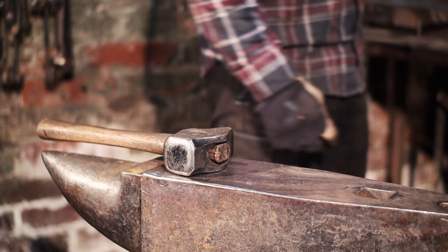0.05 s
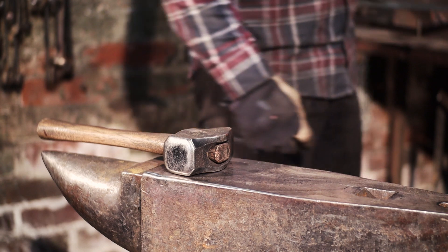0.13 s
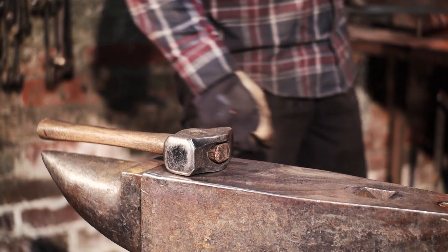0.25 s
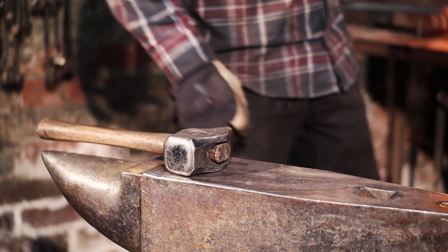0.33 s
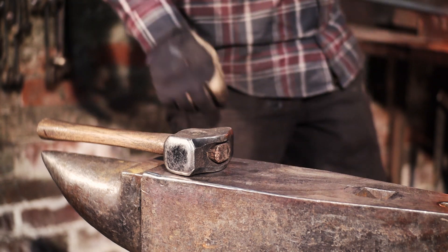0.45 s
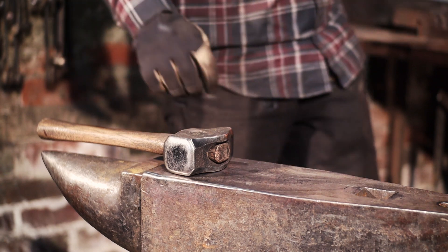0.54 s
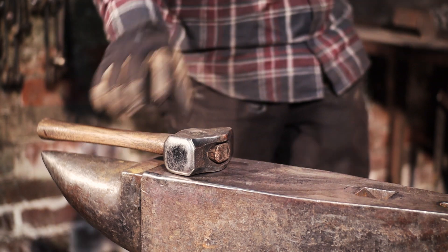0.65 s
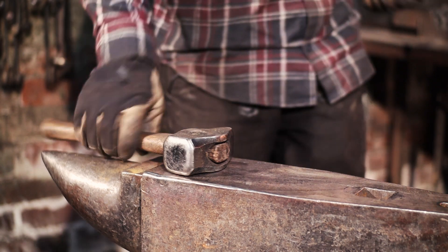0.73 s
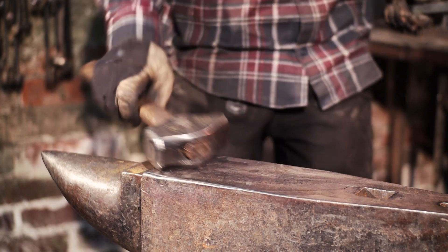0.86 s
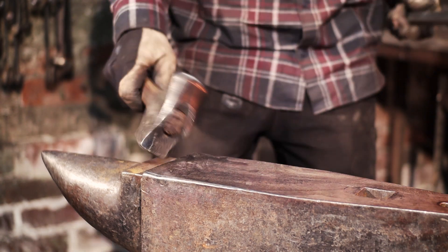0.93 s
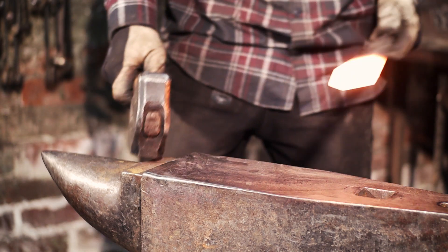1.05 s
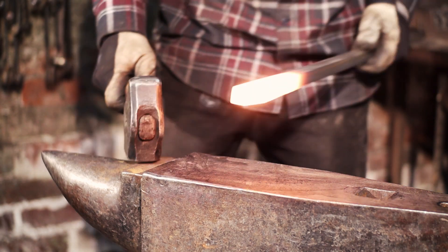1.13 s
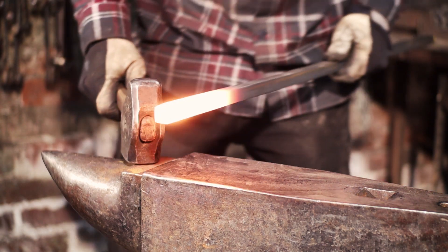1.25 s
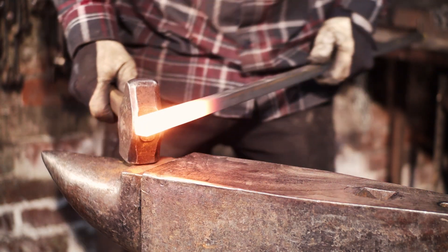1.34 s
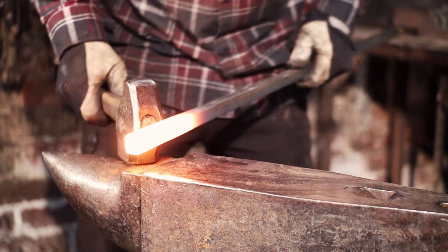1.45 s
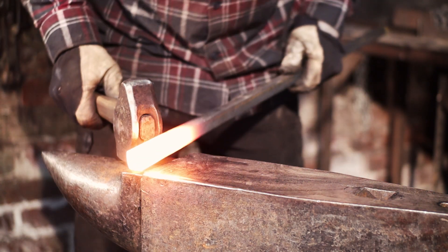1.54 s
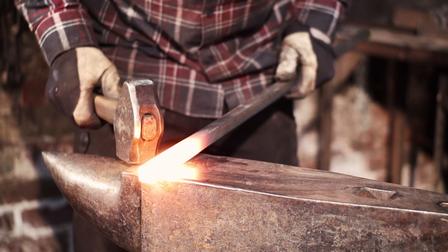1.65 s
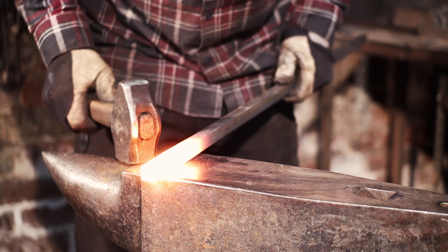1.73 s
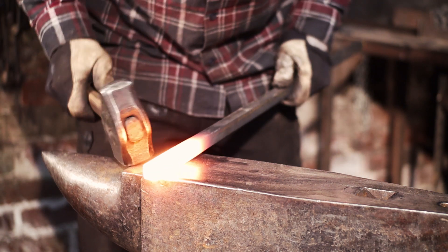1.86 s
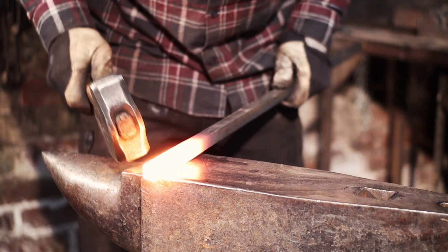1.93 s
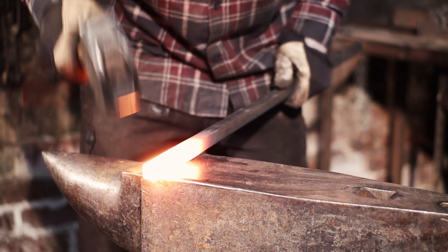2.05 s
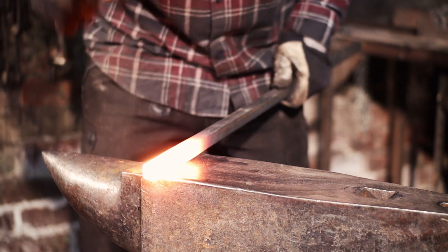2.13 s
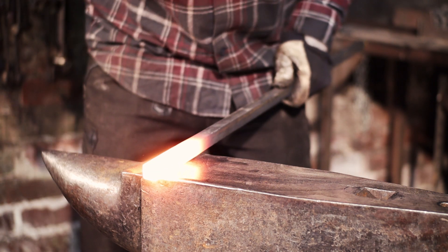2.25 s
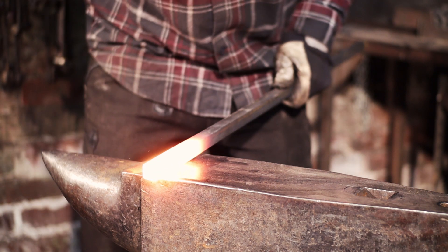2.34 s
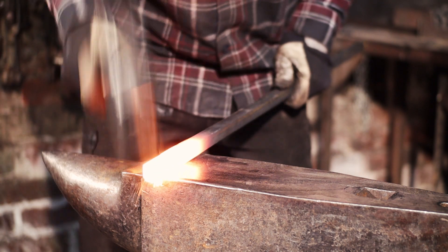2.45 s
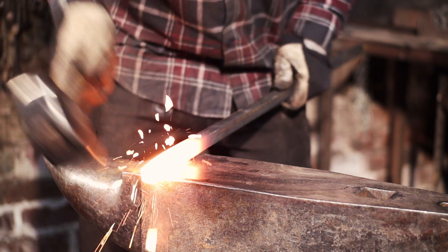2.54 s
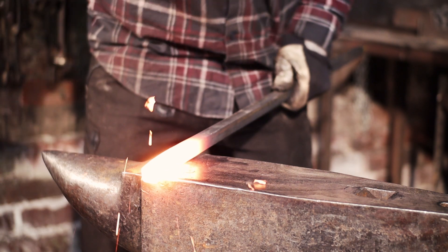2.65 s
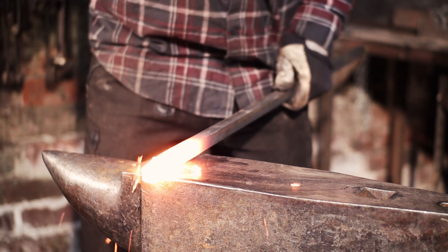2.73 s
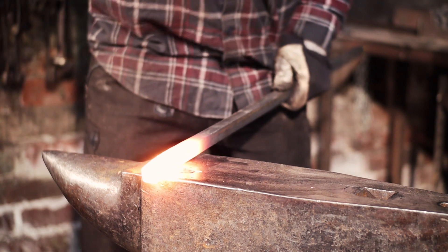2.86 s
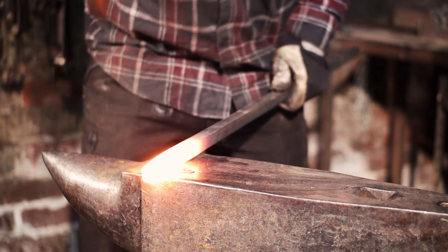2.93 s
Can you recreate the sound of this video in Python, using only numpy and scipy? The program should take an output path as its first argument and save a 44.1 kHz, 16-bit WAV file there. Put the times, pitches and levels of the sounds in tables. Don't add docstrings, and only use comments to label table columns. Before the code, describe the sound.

In a brick forge with a low blower roar, a steel tool clanks, a hammer is lifted and set down, a bar scrapes, then one hard anvil blow thumps and rings; miked near the anvil.

```python
import sys
import numpy as np
from scipy import signal
from scipy.fft import rfft, irfft
from scipy.io import wavfile
from scipy.ndimage import uniform_filter1d

SR = 44100
rng = np.random.default_rng(int(sys.argv[2]) if len(sys.argv) > 2 else 0)


def makeup_ratio(level_db):
    decades = np.asarray(level_db, float) / 20
    return 10 ** decades


def digitize_waveform(pressure):
    field = np.atleast_2d(pressure).T
    bounded = np.clip(field, -1, 1)
    quanta = np.round(bounded * 32767).astype(np.int16)
    wavfile.write(sys.argv[1], SR, quanta)


N = 134505


def rms_one(x):
    return x / np.sqrt(np.mean(x ** 2) + 1e-20)


def at_hz(points, hz):
    table_hz, values = np.transpose(points)
    return np.interp(np.log(hz), np.log(table_hz), values)


def filtered(x, order, hz, kind):
    return signal.sosfilt(signal.butter(order, hz, kind, fs=SR, output="sos"), x)


def colour(x, spectrum):
    hz = np.maximum(np.arange(len(x) // 2 + 1) * SR / len(x), 1)
    octaves_below = np.maximum(np.log2(spectrum[0][0] / hz), 0)
    octaves_above = np.maximum(np.log2(hz / spectrum[-1][0]), 0)
    gain_db = at_hz(spectrum, hz) - 24 * (octaves_below + octaves_above)
    return rms_one(irfft(rfft(x) * makeup_ratio(gain_db), len(x)))


def drift(rate_hz):
    r = np.exp(-2 * np.pi * rate_hz / SR)
    wander = signal.lfilter([1], [1, -2 * r, r * r], rng.standard_normal(N + SR))
    return rms_one(wander[SR:])


def ring(push, hz, t60):
    r, w = makeup_ratio(-60 / (t60 * SR)), 2 * np.pi * hz / SR
    return signal.lfilter([0, np.sin(w)], [1, -2 * r * np.cos(w), r * r], push + 1e-18)


def clicks(s, db):
    out = np.zeros(N)
    index = np.minimum((np.asarray(s) * SR).astype(int), N - 1)
    np.add.at(out, index, makeup_ratio(np.asarray(db)))
    return out


def dying(s, db, t60):
    rise_s = 0.00049
    r = np.exp(-1 / (rise_s * SR))
    jump = signal.lfilter([1], [1, -makeup_ratio(-60 / (t60 * SR))], clicks(s, db) + 1e-18)
    return signal.lfilter([(1 - r) ** 2], [1, -2 * r, r * r], jump)


def contact_push(push, hz, contact_s):
    return ring(push, hz, contact_s) * 2 * np.log(1000) / (contact_s * SR)


def struck(hits, pitches, modes, crack, crack_db, crack_s):
    contact_cycles, longest_contact_s, strength_spread_db = 12, 0.004, 1.5
    ring_wet_db, crack_wet_db = -5.5, 4
    s, db, hardness = np.transpose(hits)
    chance = rng.standard_normal((len(s), len(modes)))
    noise = colour(rng.standard_normal(N), crack)
    cracks = rings = sent = 0
    for at, level, hz in hits:
        soft_hz = min(hz, 0.45 * SR)
        snap = dying([at], [level + crack_db], crack_s) * filtered(noise, 2, soft_hz, "low")
        even = rms_one(filtered(colour(clicks([at], [0]), crack), 2, soft_hz, "low"))
        cracks = cracks + snap
        sent = sent + even * np.sqrt(np.mean(snap ** 2))
    for k, (hz, (mode_db, t60)) in enumerate(zip(pitches, modes)):
        softness_db = 10 * np.log10(1 + (hz / hardness) ** 4)
        push = clicks(s, db + mode_db + strength_spread_db * chance[:, k] - softness_db)
        contact_s = min(contact_cycles / hz, longest_contact_s)
        rings = rings + ring(contact_push(push, hz, contact_s), hz, t60)
    direct = rings + cracks
    to_room = makeup_ratio(ring_wet_db) * rings + makeup_ratio(crack_wet_db) * sent
    return filtered([direct, to_room], 3, crack[0][0], "high")


def thump(s, pitches, modes):
    push_s, wet_db = 0.007, -5
    push, low = clicks([s], [0]), 0
    for hz, (db, t60) in zip(pitches, modes):
        low = low + makeup_ratio(db) * ring(contact_push(push, hz, push_s), hz, t60)
    return np.array([low, makeup_ratio(wet_db) * low])


def blower():
    # (frequency [Hz], level [dB])
    roar = [(26, -36), (45, -8), (107, -22.5), (128, -18), (154, -4), (301, -5.5), (378, -12.5),
            (482, -8.5), (1700, -16.5), (2210, -72), (3740, -120)]
    # (frequency [Hz], level [dB])
    hiss = [(1120, -20), (1900, -1), (2230, -7), (2940, -1), (3770, -7), (5770, -7.5), (6250, -16),
            (14900, -33.5), (15900, -28.5)]
    # (frequency [Hz], rms level [dB])
    hum = [(100, -59.5), (226, -59.5), (302, -63), (800, -71), (12050, -99)]
    roar_db, hiss_db = -52, -64
    out = makeup_ratio(roar_db + 0.262 * drift(12)) * colour(rng.standard_normal(N), roar)
    out += makeup_ratio(hiss_db + 0.5 * drift(1.2)) * colour(rng.standard_normal(N), hiss)
    white = rng.standard_normal(N + SR)
    for hz, db in hum:
        out += makeup_ratio(db) * rms_one(ring(white, hz, 0.36)[SR:])
    return out


def forge(x):
    # (frequency [Hz], t60 [s])
    room_decay = [(60, 1.0), (250, 1.0), (700, 1), (2000, 0.76), (5000, 0.47), (9000, 0.29), (15000, 0.045)]
    first_wall_s, fill_s, even_hz = 0.0015, 0.0044, 120
    band_edges = 22 * 2 ** np.arange(0, 9.6, 1 / 3)
    t, white, tail = np.arange(SR) / SR, rng.standard_normal((2, SR)), 0
    for k, (low, high) in enumerate(zip(band_edges, band_edges[1:])):
        band = filtered(white[k % 2], 2, [low, high], "band")
        tail = tail + band * makeup_ratio(-60 * t / at_hz(room_decay, np.sqrt(low * high)))
    spectrum = rfft(tail)
    power = np.abs(spectrum) ** 2
    even = uniform_filter1d(power, size=8 * even_hz) / uniform_filter1d(power, size=even_hz)
    tail = irfft(spectrum * np.sqrt(even), SR)
    tail *= np.clip((t - first_wall_s) / fill_s, 0, 1)
    return signal.fftconvolve(x, tail / np.sqrt(np.sum(tail ** 2)))[:N]


def boom():
    boom_hz = [67, 81, 178, 262, 100, 225, 70, 315, 370, 460, 140, 62, 110, 375, 300]
    # (time [s], level [dB], t60 [s], clean share [0-1])
    booms = [(2.6, -26, 0.85, 0.9), (2.6023, -31, 0.99, 0.97), (2.6, -34, 1.02, 0.15),
             (2.598, -32, 0.84, 0.3), (0.18, -43, 1.52, 0.06), (0.3, -39, 1.11, 0.34),
             (1.331, -41.5, 0.81, 0.7), (2.6, -34, 0.69, 0.1), (2.6, -38.5, .7, 0.4), (0.25, -41.5, 1, 0.1),
             (.25, -45.5, 1.34, 0), (0.18, -49, 2, .1), (2.65, -40, 1.2, 0.36), (.22, -41, 1.28, .1),
             (.22, -45, 1.1, .1)]
    rise_s, rough_s = 0.033, 0.11
    t, white, out = np.arange(N) / SR, rng.standard_normal(N), 0
    for hz, (s, db, t60, clean) in zip(boom_hz, booms):
        age = np.maximum(t - s, 0)
        tone = np.sqrt(2) * np.sin(2 * np.pi * hz * age)
        cluster = rms_one(ring(ring(white, hz, rough_s), hz, rough_s))
        mode = clean * tone + np.sqrt(1 - clean ** 2) * cluster
        out = out + (1 - np.exp(-age / rise_s)) * makeup_ratio(db - 60 * age / t60) * mode
    return out


def flakes():
    # (time [s], level [dB], pitch [Hz])
    landings = [(2.812, -70, 12960), (2.833, -75, 11020), (2.842, -60, 12300), (2.853, -62, 7650),
                (2.898, -61, 8200), (2.946, -64, 10500), (2.953, -63, 14900), (2.963, -90, 11800),
                (2.989, -64, 11040), (3.021, -60.5, 7900), (3.048, -65, 11570)]
    white, out = rng.standard_normal(N), 0
    bright = rms_one(filtered(white, 4, 7000, "high"))
    for s, db, hz in landings:
        pitched = rms_one(ring(white, hz, 17.0 / hz))
        out = out + dying([s], [db], 0.011) * (pitched + 0.56 * bright)
    return out


def rubs():
    # (start [s], length [s])
    strokes = [(.748, .075), (.848, .028), (1.552, .075), (1.625, .07), (.062, .014), (1.405, .014),
               (.28, .155), (1.662, .03), (1.543, .012), (1.57, .035)]
    # (level [dB], low cut [Hz])
    stroke_sound = [(-53, 2900), (-55, 3390), (-44.5, 1800), (-46.5, 1900), (-53, 3200), (-51, 3600),
                    (-54, 3300), (-48, 8000), (-49, 4500), (-49, 9000)]
    # (frequency [Hz], level [dB])
    grit_colour = [(410, -43), (800, 6.5), (1590, -8), (2300, -15), (3100, -13.5), (5200, -12.5),
                   (7000, -23), (15800, -36.5)]
    grains_per_s, edge_s, patchy_db = 4600, 0.0055, 0.5
    grains = (rng.random(N) < grains_per_s / SR) * makeup_ratio(1.8 * rng.exponential(1, N))
    grains *= rng.choice([-1, 1], N)
    grit = colour(grains, grit_colour) * makeup_ratio(patchy_db * drift(30))
    t, out = np.arange(N) / SR, 0
    for (s, length), (db, low_cut_hz) in zip(strokes, stroke_sound):
        stroke = np.clip(np.minimum((t - s) * 0.5, s + length - t) / edge_s, 0, 1)
        out = out + makeup_ratio(db) * stroke * filtered(grit, 2, low_cut_hz, "high")
    return out


def squeaks():
    # (time [s], length [s], pitch [Hz], level [dB])
    slides = [
        (1.4, 0.077, 882, -45),
        (1.9, 0.063, 800, -48),
        (.895, 0.059, 850, -47.5),
    ]
    t, out = np.arange(N) / SR, 0
    for s, length, hz, db in slides:
        swell = np.sin(np.pi * np.clip((t - s) / length, 0, 1)) ** 2
        out = out + makeup_ratio(db) * swell * np.sin(2 * np.pi * hz * t)
    return out


def shank():
    shank_hz = [2806, 2900]
    # (level [dB], faint level [dB], faint t60 [s])
    shank_rings = [(-15, -32.5, 0.68), (-20.5, -30.5, .45)]
    start_s, damp_s, rise_s, damped_s, wet_db = 0.1775, 0.1914, 0.0014, 0.04, -14
    t, pair = np.arange(N) / SR, 0
    age = np.maximum(t - start_s, 0)
    held = makeup_ratio(-60 * np.maximum(t - damp_s, 0) / damped_s)
    for hz, (db, faint_db, t60) in zip(shank_hz, shank_rings):
        level = np.maximum(makeup_ratio(db) * held, makeup_ratio(faint_db - 60 * age / t60))
        pair = pair + level * np.sin(2 * np.pi * hz * age)
    pair = (1 - np.exp(-age / rise_s)) * pair
    return np.array([pair, makeup_ratio(wet_db) * pair])


def tool_clank():
    # (time [s], level [dB], hardness [Hz])
    contacts = [
        (.1765, -24.5, 5900),
        (.1790, -17.5, 11600),
        (.1838, -32, 8000),
        (.1885, -28.5, 6040),
        (.213, -33.5, 900),
        (.226, -29, 1200),
        (.236, -25.5, 1200),
    ]
    tool_hz = [377, 560, 940, 1340, 2160, 8390, 9600, 3670, 4580, 5380, 8870, 12700, 4856, 4170]
    # (level [dB], t60 [s])
    tool_modes = [(-13.5, 0.3), (-8, 0.042), (-11, 0.11), (-7.5, 0.13), (-3.5, 0.076), (-28.5, 0.18),
                  (-32, 0.13), (-28, 0.31), (-0.5, 0.046), (-21, .1), (-24.5, 0.17), (-29, 0.08),
                  (-12.5, 0.055), (-17.5, 0.092)]
    # (frequency [Hz], level [dB])
    tool_crack = [(300, -1), (440, -5), (2000, -13.5), (3000, -11), (5000, -15.5), (6500, -26),
                  (9600, -36.5), (15000, -62)]
    hearth_hz = [440, 718, 742]
    # (level [dB], t60 [s])
    hearth_modes = [(-17, 0.085), (-26, 0.21), (-21, 0.15)]
    tool = struck(contacts, tool_hz, tool_modes, tool_crack, crack_db=5, crack_s=0.021)
    return tool + thump(0.1775, hearth_hz, hearth_modes) + shank()


def handling():
    # (time [s], level [dB], pitch [Hz], ring [s])
    knocks = [
        (.997, -19, 1200, 0.019),
        (1.18, -8.5, 3000, 0.0088),
        (1.222, -20.5, 4600, 0.011),
        (1.232, -29, 620, 0.028),
        (1.28, -16.5, 4050, 0.021),
        (1.8, -30, 790, 0.024),
        (1.3233, -17, 3700, 0.0074),
        (1.343, -18.5, 840, 0.031),
        (1.342, -29, 2800, .01),
        (1, -22, 1400, 0.022),
    ]
    # (time [s], level [dB], hardness [Hz])
    thuds = [
        (.972, -49.5, 4100),
        (.982, -48, 15000),
        (1.2225, -40, 11100),
        (1.291, -41, 8000),
        (1.325, -41.5, 6000),
        (1.347, -48, 2820),
        (1.37, -73, 1500),
    ]
    body_hz = [150, 285, 388, 745, 861, 2290, 2560]
    # (level [dB], t60 [s])
    body_modes = [(3.5, 0.16), (7, 0.13), (-2.5, 0.29), (-3.5, 0.2), (-5, 0.22), (-34, 0.054), (-48, 0.1)]
    # (frequency [Hz], level [dB])
    knock_crack = [(88, -56), (150, 6), (751, -1), (2760, -10), (3410, -17.5), (4650, -19.5), (13800, -48),
                   (15500, -38)]
    # (time [s], pitch [Hz], level [dB], t60
    # [s])
    pings = [
        (.982, 12240, -63, .3),
        (1.29, 14700, -75, .2),
        (1.29, 12300, -76, .2),
        (1.225, 2565, -53, 1.3),
        (1.2252, 2577, -53, 1.3),
        (1.228, 5800, -63, .25),
        (2.601, 5206, -25, .16),
        (2.601, 5350, -29, .13),
             (.9005, 4050, -38.5, 0.019), (.901, 3150, -40, 0.019), (.901, 4722, -44, .018),
              (.9015, 2210, -40.5, .02), (.91, 2397, -56, .3), (.970, 4170, -41, 0.012),
              (.982, 4250, -40.5, 0.013), (1.2885, 2830, -34, .035), (1.289, 4810, -41, .04),
              (1.29, 5220, -52, 0.13), (1.3228, 2840, -36.5, 0.032), (1.33, 2875, -60, 0.26),
              (1.343, 4500, -47, 0.023), (1.343, 1800, -44, 0.023), (1.2225, 4370, -43, 0.019),
              (1.323, 3900, -41, 0.012), (1.29, 799, -42.5, 0.53)]
    tick_cycles = 5
    white = rng.standard_normal(N)
    out = struck(thuds, body_hz, body_modes, knock_crack, crack_db=12.5, crack_s=0.036)
    for s, db, hz, t60 in knocks:
        burst = dying([s], [db], t60) * white * np.sqrt(hz / 1000)
        tick_s = tick_cycles / hz
        out += ring(ring(burst, hz, tick_s), hz, tick_s) * hz / SR / 8
    for s, hz, db, t60 in pings:
        out += ring(clicks([s], [db]), hz, t60)
    return out


def hammer_blow():
    # (time [s], level [dB], hardness [Hz])
    contacts = [
        (2.5955, -15.5, 2070),
        (2.5975, -21, 4900),
        (2.6, -20, 17700),
        (2.6027, -27, 7050),
    ]
    anvil_hz = [1007, 3505, 4727, 13525, 14340, 15410, 2837, 2116, 2417, 5717, 3200]
    # (level [dB], t60 [s])
    anvil_modes = [(-16, 0.13), (-13, .07), (-2.5, 0.055), (-41, .12), (-32, 0.23), (-32, 0.21),
                   (-6, 0.083), (-17.5, 0.24), (-26, 0.12), (-18, .1), (-17, 0.009)]
    # (frequency [Hz], level [dB])
    blow_crack = [(160, -1), (400, -2), (900, -8), (2800, -6), (5200, -3), (8000, -13.5), (10800, -5),
                  (15800, -19.5)]
    stump_hz = [195, 278, 380, 470, 590]
    # (level [dB], t60 [s])
    stump_modes = [(-34, 0.083), (-17, 0.13), (-10.5, 0.043), (-32, 0.15), (-26, 0.058)]
    blow = struck(contacts, anvil_hz, anvil_modes, blow_crack, crack_db=3.5, crack_s=0.023)
    return blow + thump(2.5953, stump_hz, stump_modes)


def scene():
    tool_wet_db, blow_wet_db, knock_wet_db, rub_wet_db = -8.5, -10, -10, -5.5
    tool, hand, blow = tool_clank(), handling(), hammer_blow()
    rub = rubs() + flakes() + squeaks()
    to_room = makeup_ratio(tool_wet_db) * tool[1] + makeup_ratio(blow_wet_db) * blow[1]
    to_room += makeup_ratio(knock_wet_db) * hand[1] + makeup_ratio(rub_wet_db) * rub
    direct = tool[0] + blow[0] + hand[0] + rub
    return (direct + forge(to_room) + boom() + blower())[None]


def top_cut(x):
    return signal.sosfilt(signal.butter(12, 16150, fs=SR, output="sos"), x)


def record(dry):
    mic_low_hz, top_hz = 52.7, 16700
    x = filtered(dry, 3, mic_low_hz, "high")
    rounded = 1.021 * np.tanh(x / 0.81)
    mix = signal.sosfilt(signal.cheby2(12, 70, top_hz, fs=SR, output="sos"), rounded)
    return top_cut(mix)


dry = scene()
out = record(dry)
digitize_waveform(out)
```